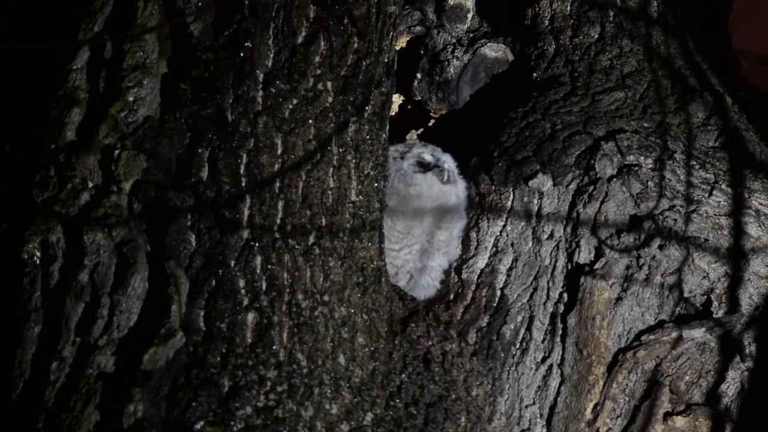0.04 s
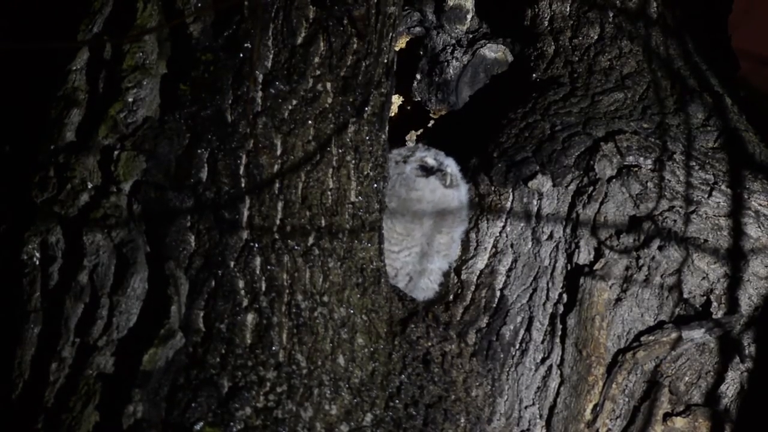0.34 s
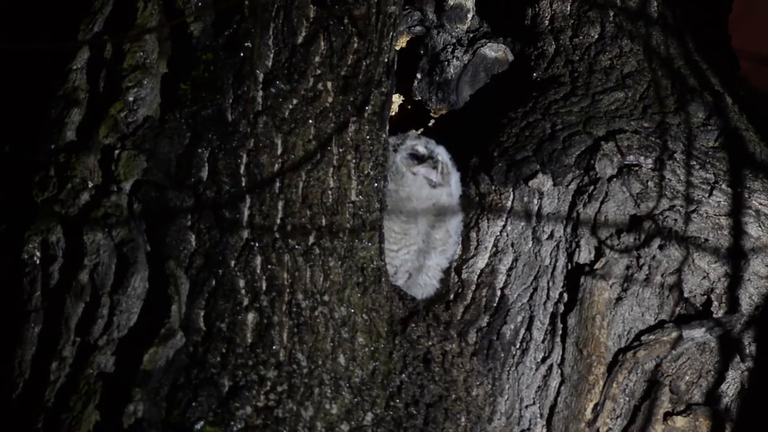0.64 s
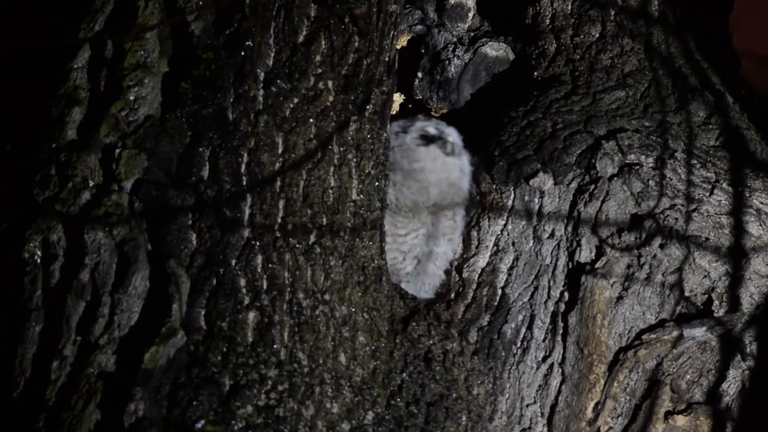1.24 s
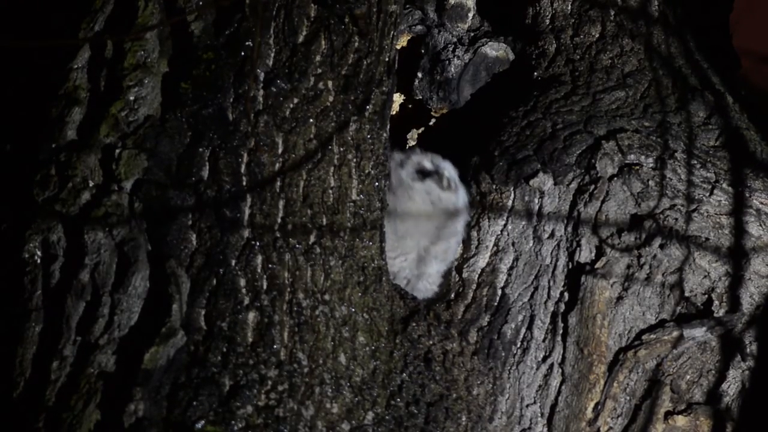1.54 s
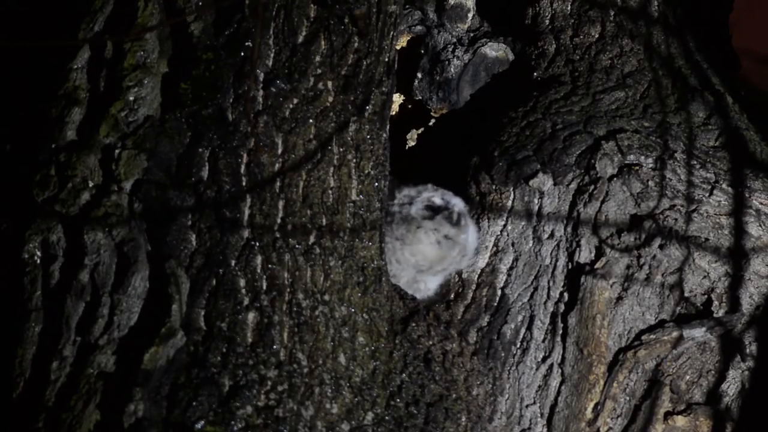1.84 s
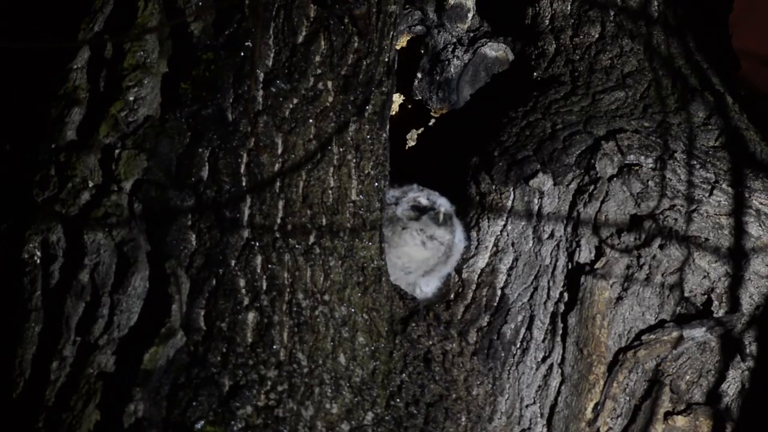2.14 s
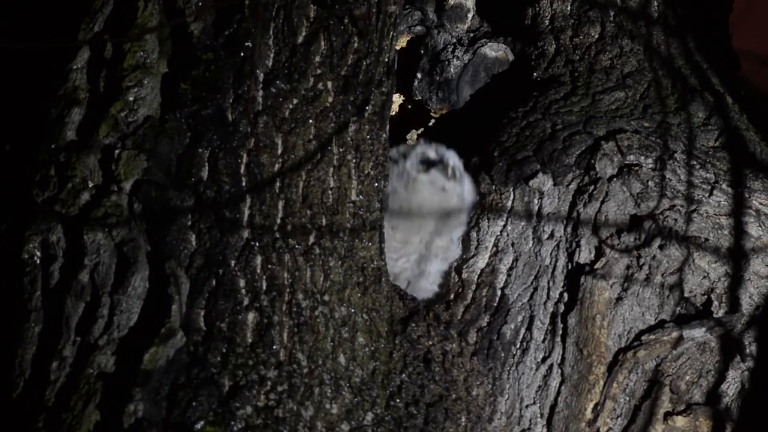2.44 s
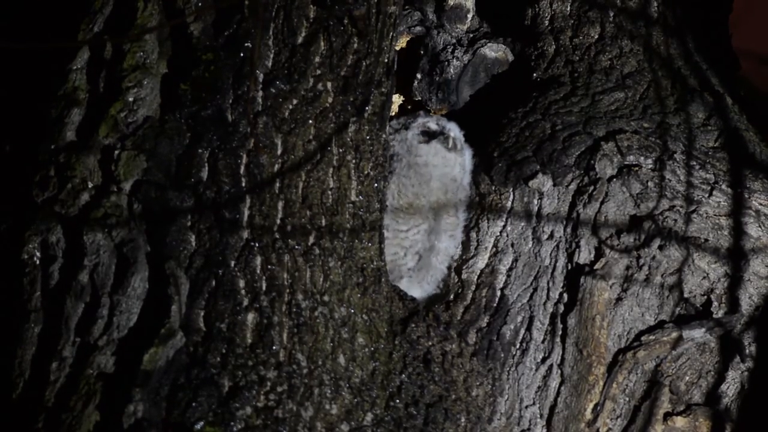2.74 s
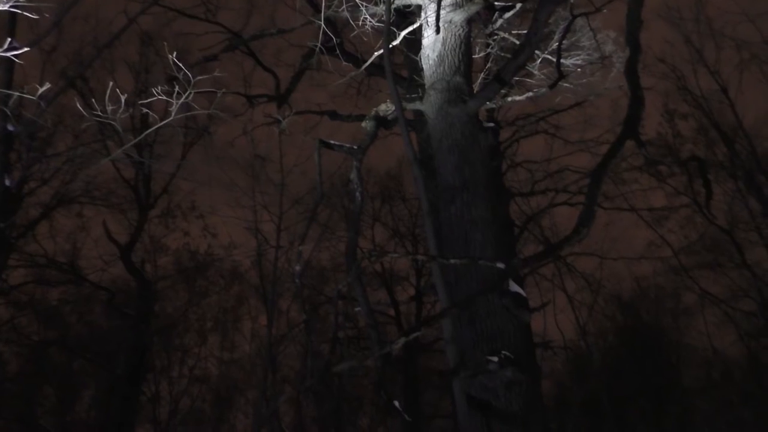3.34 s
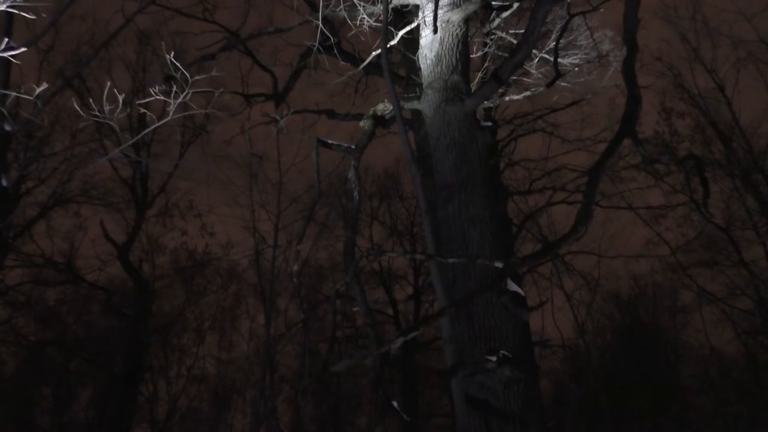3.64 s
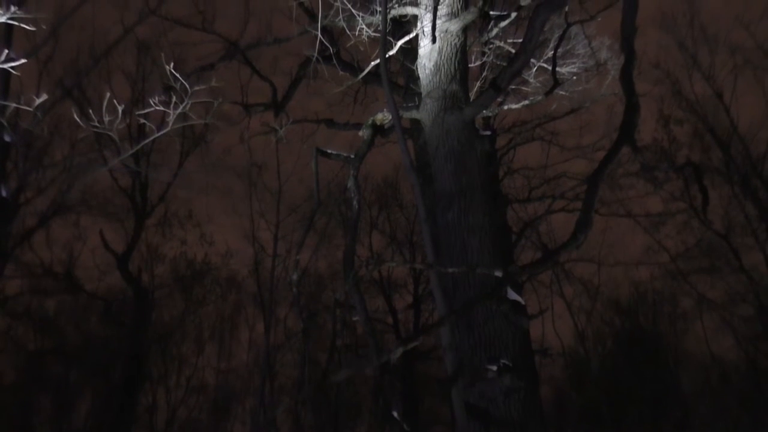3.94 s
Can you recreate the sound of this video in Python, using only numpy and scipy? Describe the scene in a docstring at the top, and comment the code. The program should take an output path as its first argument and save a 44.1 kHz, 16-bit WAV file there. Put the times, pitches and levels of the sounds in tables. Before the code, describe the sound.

A young owl gives two short, raspy squeals over faint crackles and distant rumble.

```python
"""Young owl begging at night

A young owl begs twice from a tree in a quiet wood. Its rasp is two oscillators: a low voice and a
high, unsteady whistle that the voice chops into sidebands; where the whistle meets the voice's
fourth harmonic they lock into a clear squeal. Small crackles tick nearby over a low distant
rumble, and the trees give a faint echo."""
import sys
import numpy as np
from scipy import signal
from scipy.fft import rfft, irfft, next_fast_len
from scipy.io import wavfile
from scipy.ndimage import map_coordinates

SR = 44100
rng = np.random.default_rng(int(sys.argv[2]) if len(sys.argv) > 2 else 0)


def to_wav(s):
    """Save 16-bit WAV."""
    ch = np.atleast_2d(s).T  # columns
    pcm = np.round(np.clip(ch, -1, 1) * 32767)  # PCM
    wavfile.write(sys.argv[1], SR, pcm.astype(np.int16))


N = 176400


def amp(db):
    """Decibels to gain."""
    return 10 ** (np.asarray(db) / 20)


def unit(x):
    """Scale to rms 1."""
    return x / np.sqrt(np.mean(np.abs(x) ** 2) + 1e-20)


def curve_at(points, hz):
    """Interpolate (freq_hz, value) points on a log frequency axis."""
    freq_hz, values = np.transpose(points)
    return np.interp(np.log(hz + 1), np.log(freq_hz + 1), values)


def filtered(x, response):
    """Zero-phase filter with gain response(hz)."""
    size = next_fast_len(N + 8192)
    return irfft(rfft(x, size) * response(np.fft.rfftfreq(size, 1 / SR)), size)[..., :N]


def noise(spectrum):
    """Coloured noise, rms 1."""
    return unit(filtered(rng.standard_normal(N), lambda hz: amp(curve_at(spectrum, hz))))


def wobble(knots_per_s, t):
    """Smooth random curve, rms 1."""
    return unit(map_coordinates(rng.standard_normal(8192), [(t - t[0]) * knots_per_s], mode='wrap'))


def flutter(knots_per_s, t):
    """Random amplitude and phase that smear a tone into a band."""
    return unit(wobble(knots_per_s, t) + 1j * wobble(knots_per_s, t))


def phasor(hz):
    """Unit phasor following a pitch."""
    return np.exp(2j * np.pi * np.cumsum(hz) / SR)


def night():
    """Distant rumble, wavering hums and a thin, even hiss."""
    # noise spectra: freq_hz, relative_db
    rumble_spectrum = [(12, -54), (20, -12), (30, -22), (43, -12.5), (59, -15), (81, -8), (126, -6),
                       (154, -2), (188, -3.5), (234, 0), (262, -3.5), (341, -4), (382, -6), (581, -8),
                       (742, -7.5), (829, -10), (1080, -12), (2570, -27.5), (4000, -34), (5200, -34),
                       (8800, -120)]
    air_spectrum = [(1500, -30), (3000, -17), (5000, -0.5), (7000, 3), (9000, 4.5), (12000, -1),
                    (15800, -1.5)]
    # distant hums: pitch_hz, level_db, wavers_per_s
    drones = [(54.6, -62, 9.2), (164.8, -61.5, 6.03), (721.5, -60.5, 22)]
    t = np.arange(N) / SR
    hums = sum(amp(level_db) * unit((flutter(wavers_per_s, t) * np.exp(2j * np.pi * pitch_hz * t)).real)
               for pitch_hz, level_db, wavers_per_s in drones)
    return amp(-43.5) * noise(rumble_spectrum) + amp(-61.5) * noise(air_spectrum) + hums


def crackles():
    """Dry snaps, each around a very short ring; many fainter ones come at random."""
    # near crackles: start_s, ring_db, ring_hz, snap_db (before halving)
    near = [(.0190, -36.5, 9700, -41), (.0375, -38, 9000, -29), (.0920, -40, 7860, -33),
            (.2130, -42, 3980, -30.5), (0.255, -38, 10000, -44), (0.3862, -28.5, 5540, -29.5),
            (0.5254, -31, 1750, -32), (.7712, -32, 10440, -22), (.8985, -40, 2100, -52),
            (0.9999, -26, 8570, -24.5), (1.0082, -34.5, 1880, -31), (1.2879, -46, 6860, -23.5),
            (1.7390, -35, 9600, -30.5), (1.884, -40, 8600, -37), (1.949, -33.5, 10800, -41),
            (2.1200, -44, 8800, -47), (2.5280, -36, 1890, -27), (2.5747, -29.5, 9500, -27),
            (2.6590, -51, 4500, -33), (2.698, -43, 5000, -36), (2.7324, -39, 2900, -27),
            (2.908, -35, 1670, -46), (2.943, -44, 2500, -33.5), (3.2281, -30, 1860, -26.5),
            (3.3405, -49, 5540, -31.5), (3.8397, -25, 1370, -33)]
    far_per_s, far_db, far_hz = 71, -51, 9400
    ring_t60_s, ring_extra_cycles = 0.0043, 0.7
    snap_t60_s, snap_width_oct = 0.0038, 1.7
    far = [(when * N / SR, far_db - 2.5 * np.log(rank + 0.0085), far_hz * 2 ** (0.67 * (pitch - .5)),
            far_db) for when, rank, pitch in rng.random((int(far_per_s * N / SR), 3))]
    out = np.zeros(N + SR)
    t = np.arange(1024) / SR
    hz = np.fft.rfftfreq(len(t), 1 / SR) + 1
    for start_s, ring_db, ring_hz, snap_db in near + far:
        t60_s = ring_t60_s + ring_extra_cycles / ring_hz
        ring = amp(ring_db - 60 * t / t60_s) * np.sin(2 * np.pi * ring_hz * t)
        rolloff = 1 + (np.log2(hz / ring_hz) / snap_width_oct) ** 2
        grit = unit(irfft(rfft(rng.standard_normal(len(t))) / rolloff))
        fade = amp(-60 * t / snap_t60_s)
        grit_rms = np.linalg.norm(fade * grit) / np.linalg.norm(fade)
        snap = 0.5 * amp(snap_db) * fade * grit / grit_rms
        out[round(start_s * SR):][:len(t)] += ring + snap
    return out[:N]


def chopped_whistle(whistle, voice, chop, rough, t):
    """The voice chops the whistle into sidebands; the far upper ones are rougher."""
    # sideband offsets from the whistle: voice_multiple
    orders = [-1, 0, 1, 2, 3, 4]
    # sideband weights: relative_db
    weights_db = [-1.5, 0.5, 0.5, 1.5, 0.5, 0]
    shimmer_db, shimmer_per_s, rasp_per_s = 2.3, 150, 1400
    squeal, power = 0, 0
    for order, weight_db in zip(orders, weights_db):
        gain = amp(weight_db) * (chop if order else 1)
        purity = (1 - rough) ** (1 + 0.2 * order * (order - 1) * (order > 0))
        clear = np.sqrt(purity) * unit(amp(shimmer_db * wobble(shimmer_per_s, t)))
        rasp = np.sqrt(1 - purity) * flutter(rasp_per_s, t)
        squeal += gain * whistle * voice ** order * (clear + rasp)
        power += gain ** 2
    return squeal.real * np.sqrt(2 / power)


def throat(x, edge_hz):
    """Throat and beak resonance; little leaks through below its lower edge."""
    # throat and beak response: freq_hz, gain_db
    resonance = [(1000, -10), (2500, 7.5), (3800, 1.5), (5100, 0.5), (5900, -6.5), (6800, 1), (7900, 0),
                 (8600, -13.5), (10500, -15.5), (12000, -29), (16000, -32)]
    leak_db = -20

    def response(hz):
        highpass = 1 / (1 + (edge_hz / (hz + 1)) ** 12)
        return amp(curve_at(resonance, hz)) * (amp(leak_db) + highpass)
    return filtered(x, response)


def begging_call(contour, edge_hz):
    """Chopped whistle and breath through the throat, plus the unfiltered low voice."""
    # air through the throat: freq_hz, relative_db
    breath_spectrum = [(1000, -25), (2500, 12), (4300, 12.5), (7500, -7), (10000, -17), (16000, 21)]
    lock_range_hz, voice_jitter_hz, whistle_jitter_hz, jitter_per_s = 75, 5, 55, 400
    time_s, *columns = np.transpose(contour)
    span = np.arange(int(time_s[0] * SR), int(time_s[-1] * SR))
    t = span / SR
    whistle_hz, voice_hz, whistle_db, voice_db, chop, rough = [np.interp(t, time_s, c) for c in columns]
    chop, rough = np.clip(chop, .01, 1.5), np.clip(rough, .01, .98)
    locked = abs(whistle_hz - 4 * voice_hz) < lock_range_hz
    whistle_hz = np.where(locked, 4 * voice_hz, whistle_hz)
    voice = phasor(voice_hz + voice_jitter_hz * wobble(jitter_per_s, t))
    whistle = phasor(whistle_hz + whistle_jitter_hz * np.sqrt(rough) * wobble(jitter_per_s, t))
    squeal = chopped_whistle(whistle, voice, chop, rough, t)
    breath = amp(3.5) * np.sqrt(rough * chop) * noise(breath_spectrum)[span]
    octave = amp(3) * (1 - rough) ** 2.8 * voice ** 2  # fades as the voice roughens
    high, low = np.zeros((2, N))
    high[span] = amp(whistle_db) * (squeal + breath)
    low[span] = amp(voice_db) * (voice + octave).real
    return throat(high, edge_hz) + low


def owl():
    """Two begging calls from a perch in a tree."""
    # call contours: time_s, whistle_hz, voice_hz, whistle_db (before throat), voice_db, chop, roughness
    first_call = [(.462, 3817, 1124, -60, -67, .3, .35), (.469, 4780, 1212, -38, -51, 0, 0.3),
                  (.482, 5280, 1298, -34.5, -40.5, 1, 0.42), (.497, 6550, 1340, -39, -54, 0.7, .55),
                  (.510, 6670, 1321, -37, -64, 0.3, .4), (.528, 7000, 1318, -48, -75, .08, 1),
                  (.556, 7300, 1329, -43, -75, 0.44, 1.1), (.582, 6650, 1340, -35, -62, 0.4, 0.7),
                  (.604, 5740, 1375, -33, -50, 0.85, .65), (.624, 5260, 1315, -33.5, -45, 0.64, 0.02),
                  (.660, 5212, 1281, -33.5, -49, 0.4, 0), (.688, 5380, 1348, -31.5, -45, 0.94, 0.04),
                  (.702, 5830, 1361, -33, -47, 0.7, .7), (.718, 5830, 1423, -31.5, -43, 0.7, 0.5),
                  (.744, 5030, 1284, -33, -44.5, 1, 0.05), (.757, 4780, 1260, -49, -67, 1, .6)]
    second_call = [(3.373, 3400, 1147, -55, -67, .2, .4), (3.381, 4700, 1210, -36.5, -45.5, 0.54, .4),
                   (3.394, 5900, 1300, -43, -46, 1, .6), (3.407, 6750, 1308, -36.5, -62, 0.55, 0.57),
                   (3.428, 7000, 1284, -50, -75, 0.12, .95), (3.458, 7300, 1320, -56, -75, 0.063, 1),
                   (3.487, 7050, 1333, -39.5, -66, 0.19, 0.54), (3.508, 6100, 1377, -33.5, -51, 0.97, 0.44),
                   (3.530, 5480, 1323, -35, -47, 0.41, 0.49), (3.556, 5290, 1299, -33.5, -43, 0.22, .42),
                   (3.584, 5400, 1355, -34.5, -45, 0.25, .37), (3.604, 5920, 1387, -34, -47, 0.62, .45),
                   (3.630, 6250, 1456, -31.5, -51, 0.57, 0.4), (3.646, 5970, 1400, -32, -46, 0.45, .37),
                   (3.659, 5150, 1285, -36, -42, .5, 0.26), (3.672, 4700, 1225, -41, -62, 0.76, .65)]
    return trunk(begging_call(first_call, edge_hz=3230)) + trunk(begging_call(second_call, edge_hz=3170))


def trunk(x):
    """Direct sound plus weak early reflections from bark and branches."""
    delays_s = rng.uniform(0.0026, 0.024, size=8)
    reflections = sum(np.pad(x, (int(delay_s * SR), 0))[:N] for delay_s in delays_s)
    return x + amp(-12) * reflections / np.sqrt(len(delays_s))


def woods(x):
    """Diffuse echo from trunks, each frequency dying at its own rate."""
    # echo decay: freq_hz, t60_s
    decay = [(500, .5), (3000, 0.53), (5500, 0.68), (8000, 0.53), (15000, .25)]
    hz, t, spectrogram = signal.stft(rng.standard_normal(SR), SR, nperseg=256)
    fade = amp(-60 * t / curve_at(decay, hz)[:, None])
    _, tail = signal.istft(spectrogram * fade, SR, nperseg=256)
    impulse = np.pad(tail, (SR // 200, 0)) / np.linalg.norm(tail)  # 5 ms predelay
    return signal.fftconvolve(x, impulse)[:N]


def scene():
    """Owl and crackles in the wood, the same in both ears."""
    calls = owl()
    ticks = crackles()
    echo = woods(amp(-12.5) * calls + amp(-16) * ticks)
    mono = calls + ticks + echo + night()
    return np.array([mono, mono])


def record(dry):
    """Brick-wall low-pass."""
    cutoff_hz = 15900
    return filtered(dry, lambda hz: hz < cutoff_hz)


dry = scene()
out = record(dry)
to_wav(out)
```